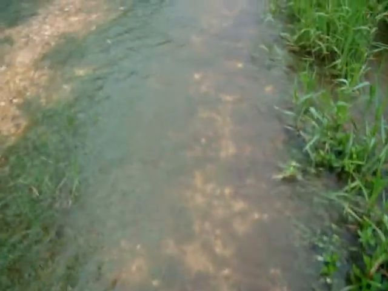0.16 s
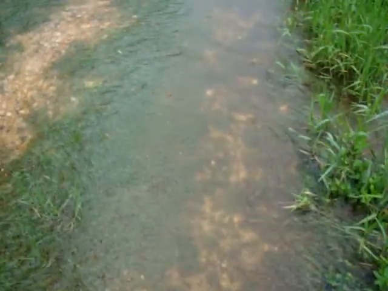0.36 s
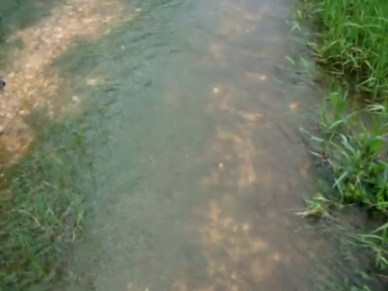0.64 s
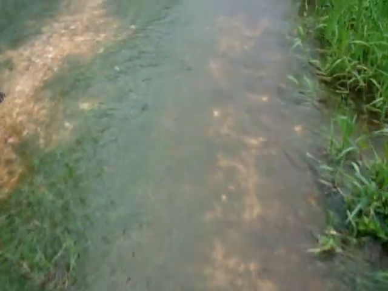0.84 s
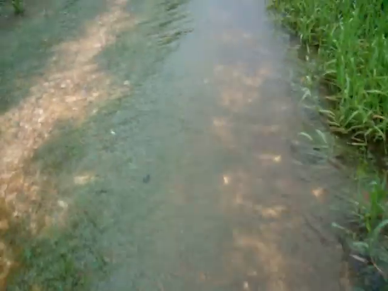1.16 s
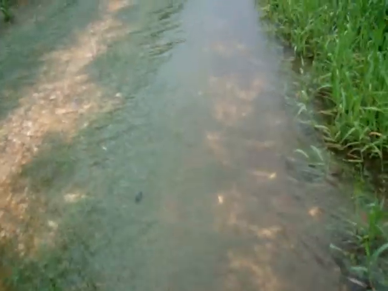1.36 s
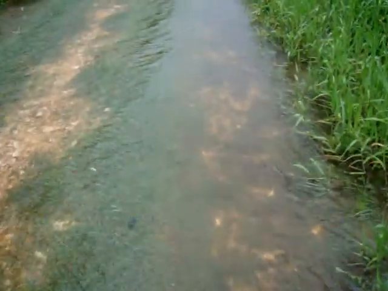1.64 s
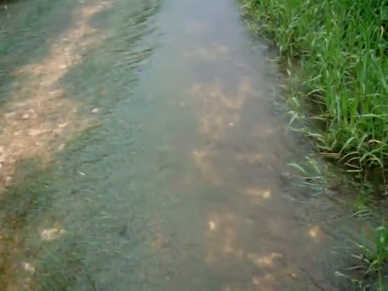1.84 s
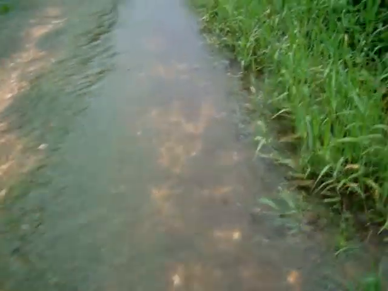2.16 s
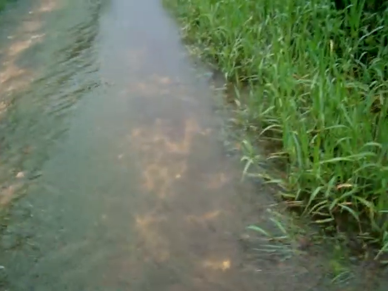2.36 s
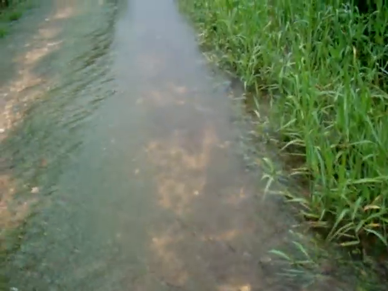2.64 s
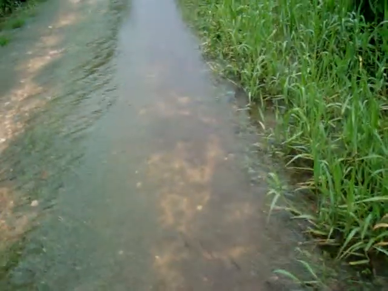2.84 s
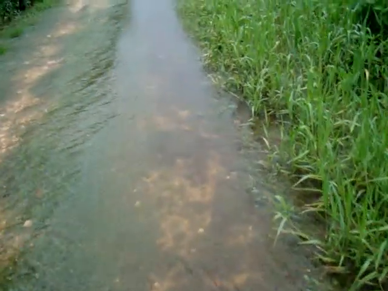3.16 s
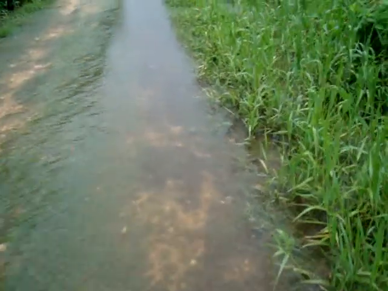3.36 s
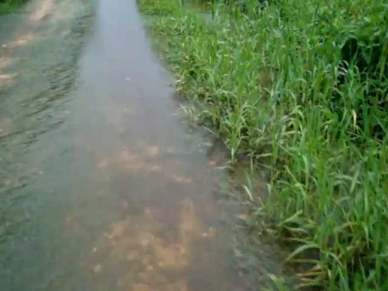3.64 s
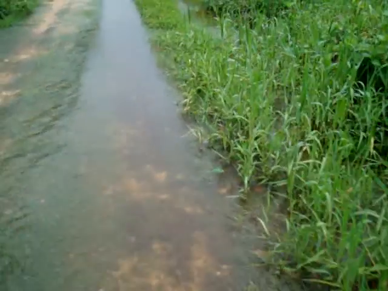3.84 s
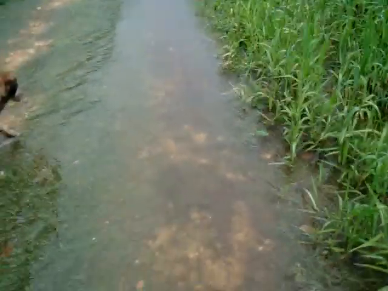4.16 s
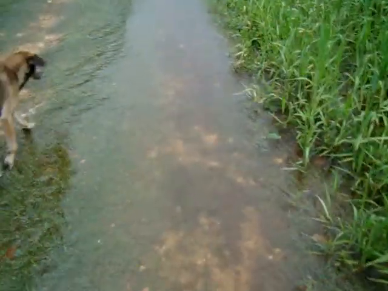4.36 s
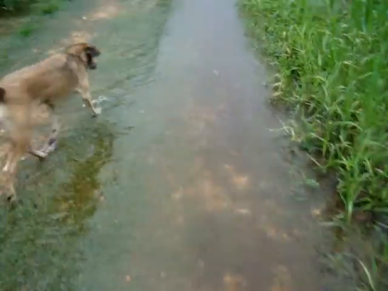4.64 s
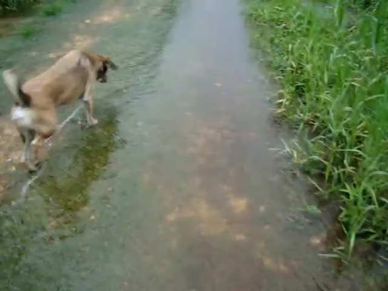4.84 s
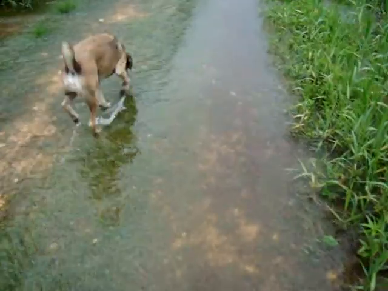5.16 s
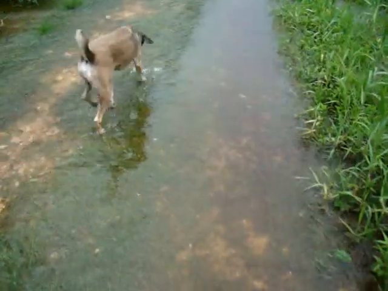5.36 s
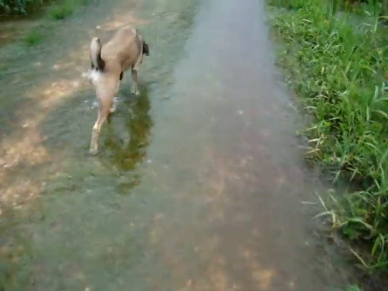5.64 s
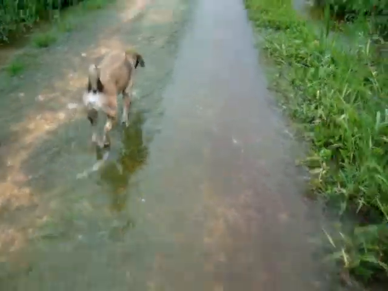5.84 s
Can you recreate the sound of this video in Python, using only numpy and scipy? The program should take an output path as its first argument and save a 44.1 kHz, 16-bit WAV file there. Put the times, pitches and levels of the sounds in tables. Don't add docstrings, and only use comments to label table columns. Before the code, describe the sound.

Outdoors on a flooded grassy track, a thick, steady frog chorus buzzes and croaks, with a fast rattling trill, low hooting toads and thin insect rasps. About five slow wading steps swell the water's hiss and gurgle, leaving plops, bright drips and sharp slaps. One microphone hears everything, its level dipping briefly at several splashes.

```python
import sys
import numpy as np
from scipy import signal
from scipy.io import wavfile
from scipy.ndimage import uniform_filter1d

SR = 44100
rng = np.random.default_rng(int(sys.argv[2]) if len(sys.argv) > 2 else 0)


def linear_from_db(decibels):
    return 10 ** (np.asarray(decibels, float) / 20)


def wav_record(signal):
    frames = np.transpose(np.atleast_2d(signal))
    bounded = np.clip(frames, -1, 1)
    quanta = np.round(bounded * 32767).astype(np.int16)
    wavfile.write(sys.argv[1], SR, quanta)


N = 264820

# t/s, level above calm/dB
WADING_STEPS = [
    (.78, 8),
    (2.068, 7.5),
    (3.13, 3.5),
    (4.3, 2.5),
    (5.43, 4.5),
]


def rms_one(x):
    return x / np.sqrt(np.mean(x ** 2) + 1e-20)


def in_time(rows):
    s, *columns = np.transpose(rows)
    return [np.interp(np.arange(N) / SR, s, c) for c in columns]


def swells(events, rise_s, fall_s):
    t = np.arange(N) / SR
    return np.max([np.interp(t, [s - rise_s, s, s + fall_s], [0, db, 0]) for s, db in events], axis=0)


def drift(rate_hz):
    r = np.exp(-80 * np.pi * rate_hz / SR)
    white = rng.standard_normal(N // 40 + 2002)
    slow = signal.lfilter([1], [1, -2 * r, r * r], white)[2000:]
    return np.interp(np.arange(N) / 40, np.arange(len(slow)), rms_one(slow))


def resonate(x, hz, width_hz):
    r = np.exp(-np.pi * width_hz / SR)
    section = [1 - r, 0, r - 1, 1, -2 * r * np.cos(2 * np.pi * hz / SR), r * r]
    return signal.sosfilt([section, section], x + 1e-18)


def bandpass(x, low_hz, high_hz):
    return signal.sosfilt(signal.butter(2, [low_hz, high_hz], "band", fs=SR, output="sos"), x)


def pulses(cycles, rough_db):
    at = np.flatnonzero(np.diff(np.floor(cycles)) > 0)
    clicks = np.zeros(N)
    clicks[at] = linear_from_db(rough_db * rng.standard_normal(N // 40)[:len(at)])
    return clicks


def slide(hz, gain):
    return np.sqrt(2) * gain * np.sin(2 * np.pi * np.cumsum(hz) / SR)


def crowd(count, low_hz, high_hz, width_hz, per_s, calls_per_s, depth_db):
    out, t = 0, np.arange(N) / SR
    for hz, (own, start) in zip(np.linspace(low_hz, high_hz, count), rng.random((count, 2))):
        wander = drift(3.0)
        calls = calls_per_s * t * (.8 + 0.405 * own) + start + 0.15 * wander
        swell = linear_from_db(depth_db * np.sin(2 * np.pi * calls))
        clicks = pulses(per_s * (.85 + .3 * own) * t + .8 * wander, 1.5) * swell
        out = out + rms_one(resonate(clicks, hz, width_hz))
    return out / np.sqrt(uniform_filter1d(out ** 2, size=SR // 12))


def blips(events, cycles, rise, gain_db):
    out = np.zeros(N + SR)
    for s, peak_db, hz in events:
        age = np.arange(int(8 * cycles / hz * SR)) * hz / SR / cycles
        tone = np.sin(2 * np.pi * cycles * age * (1 + rise * (age / 2 - 1)))
        at = int((s - cycles / hz) * SR)
        out[at:at + len(age)] += linear_from_db(peak_db + gain_db) * age * np.exp(1 - age) * tone
    return out[:N]


def far_toads(count, blur):
    # t/s, level/dB
    toad_levels = [(0, -37.5), (.7, -33.5), (.95, -36), (2.14, -32), (2.45, -38), (2.85, -33), (3.5, -34),
                   (4.85, -39), (5.05, -35), (6, -34)]
    out = np.zeros(N + SR)
    for s, length, pitch, glide, high, level in rng.random((count, 6)):
        n = int((.04 + .12 * length) * SR)
        upper = high < .25
        centre_hz = (785 + 60 * (pitch - .5)) if upper else (570 + 100 * (pitch - .5))
        hz = centre_hz + 260 * (glide - .55) * (np.arange(n) - n / 2) / SR
        at = int(s * (N + SR - n))
        out[at:at + n] += slide(hz, np.hanning(n) * linear_from_db(4.6 * level - 0.53 * upper))
    hum = 0
    for hz, width_hz, weight in (597, 130, 1), (755, 230, .57), (352.5, 64, .33):
        hum = hum + weight * resonate(rng.standard_normal(N), hz, width_hz)
    blurred = rms_one(out[SR // 2:SR // 2 + N]) + blur * rms_one(hum)
    even = blurred / np.sqrt(uniform_filter1d(blurred ** 2, size=SR // 8))
    return linear_from_db(in_time(toad_levels)[0] - 0.5) * even


def buzzing_frogs():
    # t/s, level/dB
    buzz_levels = [(0.0, -28.5), (2.1, -28.5), (2.31, -30.5), (3.18, -26), (4.74, -31), (6.0, -25.5)]
    # t/s, level above the crowd/dB
    surges = [(.02, 0.5), (.37, 3.5), (.6, 1), (.84, 5.5), (1.07, 5), (1.25, 2.5), (1.46, 4), (1.66, 3.5),
              (1.85, 1), (2.03, 1), (2.91, -5), (3.05, 1.5), (3.33, 2), (3.97, 4), (4.14, 3), (4.47, 1),
              (4.56, 4), (4.7, 5), (5.6, 2), (5.72, 2), (5.83, 2), (5.95, -1.5)]
    level_db = in_time(buzz_levels)[0] + swells(surges, rise_s=0.056, fall_s=0.075)
    buzz = crowd(count=9, low_hz=2390, high_hz=3080, width_hz=383, per_s=195, calls_per_s=5.5, depth_db=4.0)
    return linear_from_db(level_db - 2.0) * buzz


def shrill_frogs():
    # t/s, level/dB
    shrill_levels = [(0.0, -38.5), (0.32, -36.5), (2.21, -34.5), (2.42, -39.5), (2.77, -33.5), (3.04, -37),
                     (3.78, -34), (4.04, -38), (5.93, -35), (6.0, -37.5)]
    shrill = crowd(count=10, low_hz=5047, high_hz=5550, width_hz=485,
                   per_s=110, calls_per_s=4.3, depth_db=6.0)
    return linear_from_db(in_time(shrill_levels)[0] + 1.5) * shrill


def triller():
    # t/s, level/dB
    trill_levels = [(0, -32), (.28, -34), (.45, -30.5), (1.1, -29.5), (1.45, -30), (1.8, -32.5),
                    (2.07, -30.5), (2.3, -40.5), (2.7, -44), (3.18, -34), (3.95, -35), (4.74, -35),
                    (5.56, -31.5), (6, -33)]
    # t/s, share of the near frog/0-1, lowering of its throat/0-1
    near_trill = [(.28, 0, 0), (.4, .75, .1), (.8, .88, .15), (1.6, .8, .2), (2.0, .6, 0), (2.3, .2, 0),
                  (3.2, .5, .5), (4.4, .2, 1), (4.8, .65, 1), (5.3, .45, 1), (6, .55, 1)]
    (level_db,), (share, lowered) = in_time(trill_levels), in_time(near_trill)
    t = np.arange(N) / SR
    rush = .96 * np.exp((.3 - t) / .4)
    tiring = .8 * np.maximum(t - 4.7, 0)
    knocks = 39.7 * t + 1.63 - rush - tiring
    first = pulses(knocks + .025 * drift(30), 2.2)
    near = 0
    for hz, weight in (1870, 1 - lowered), (1785, lowered):
        pair = first + .75 * np.roll(first, round(9 / hz * SR))
        after = resonate(np.roll(first, SR // 300), .88 * hz, 300)
        near = near + weight * rms_one(resonate(pair, hz, 360) + .45 * after)
    others = crowd(count=6, low_hz=1683, high_hz=1942, width_hz=280, per_s=90, calls_per_s=0.72, depth_db=1.5)
    return linear_from_db(level_db + 0.76) * (np.sqrt(share) * near + np.sqrt(1 - share) * others)


def insects():
    # t/s, level of the high, middle and low insect/dB
    insect_levels = [(0.0, -46, -35, -42.5), (0.17, -42.5, -41.5, -45.5), (0.97, -38, -39, -37.5),
                     (1.17, -42.5, -41, -41.5), (2.02, -38, -39, -41.5), (2.19, -38.5, -37, -38),
                     (2.39, -42.5, -44, -41.5), (2.69, -36.5, -42.5, -47), (4.38, -43.5, -40.5, -38.5),
                     (5.16, -40, -41.5, -43.5), (5.38, -43, -38.5, -39), (6.0, -45.5, -43, -38.5)]
    insect_voices = [
        (8803, 330, 0.6),
        (8310, 1600, 0.67),
        (6703, 470, 0.94),
        (6153, 250, 1),
    ]
    wings = [
        (-.19, 85.23, .108),
        (-.12, 56.7, 0),
        (-.38, 42.67, 0),
    ]
    out, t = 0, np.arange(N) / SR
    high_db, middle_db, low_db = in_time(insect_levels)
    levels = [high_db, high_db - 3.5, middle_db, low_db]
    strokes = wings[:1] + wings
    for level_db, (done, per_s, slowing), (hz, width_hz, share) in zip(levels, strokes, insect_voices):
        stroke = (done + per_s * t - slowing * t ** 2 / 2 + share / 2 + 0.058) % 1
        gate = np.sin(np.pi * np.clip(stroke / share, 0, 1)) + 0.12
        rasp = 0.62 * np.sin(2 * np.pi * hz * t + 2.5 * drift(150)) + rng.standard_normal(N)
        out = out + linear_from_db(level_db - 1.5) * rms_one(resonate(gate * rasp, hz, width_hz))
    return out


def running_water():
    # f/Hz, spectral level/dB per Hz
    water_colour = [(18, -75), (30, -39), (130, -34.5), (240, -35.5), (330, -20.5), (450, -15), (600, -4),
                    (1090, -8), (1850, -3.5), (2900, -4), (4470, -7), (5600, -12.5), (7470, -18.5),
                    (10300, -24), (13300, -60)]
    out, white, edges = 0, rng.standard_normal((2, N)), 28 * 2 ** np.arange(0, 8.7, 1 / 3)
    colour_hz, colour_levels = np.transpose(water_colour)
    together, stir_db = drift(10), swells(WADING_STEPS, rise_s=0.52, fall_s=0.28)
    for k, (low, high) in enumerate(zip(edges, edges[1:])):
        band = bandpass(white[k % 2], low, high)
        colour_db = np.interp(np.log(low * high) / 2, np.log(colour_hz), colour_levels)
        reach = np.exp(-(np.log(low / 1100) / 1.3) ** 2) + (low > 2500) * 0.15
        patchy_db = 1.3 * together + (1.8 if low < 2500 else 0.6) * drift(11)
        out = out + band * linear_from_db(colour_db + reach * (stir_db - stir_db.mean()) + patchy_db)
    return linear_from_db(-44 + stir_db.mean() + 12.5) * rms_one(out)


def spray():
    # t/s, level above the steady drizzle/dB
    flung = [
        (.23, 7.5),
        (.32, 3),
        (.67, 7.5),
        (1.07, 3),
        (2.22, -3),
        (3.49, 8),
        (3.96, 14),
        (4.2, 5),
        (4.62, 2.5),
        (5.21, 6.5),
    ]
    sizes = linear_from_db(5.1 * np.minimum(rng.exponential(1, N), 5)) * rng.choice([-1, 1], N)
    drops_per_s = 4000 * linear_from_db(3.0 * drift(40))
    drops = sizes * (rng.random(N) < drops_per_s / SR)
    spray_db = -47 + swells(flung, rise_s=0.07, fall_s=0.055)
    return linear_from_db(spray_db + 6.5) * rms_one(bandpass(drops, 6000, 12000))


def whoops():
    # t/s, length/s, start f/Hz, end f/Hz, level/dB
    whoop_calls = [(0.044, 0.76, 365, 452.5, -49.5), (2.081, 0.89, 369.6, 556, -47),
                   (2.8, 0.82, 340, 505.4, -45.5), (3.854, 0.66, 382, 435, -55),
                   (5.095, 0.79, 344.6, 506, -49), (0, 0.3, 309.6, 285, -54.5),
                   (0.048, 0.61, 350, 319, -52), (0.752, 0.16, 316, 270, -70),
                   (0.947, 0.51, 349, 326.4, -55), (1.105, 0.46, 309, 275, -54),
                   (1.313, 0.26, 338, 320, -44.5), (1.58, 0.16, 351, 341, -44.5),
                   (1.747, 0.35, 328, 321, -53), (2.283, 0.84, 341.4, 306.5, -53.5),
                   (3.286, 0.49, 340, 311, -47), (3.588, 0.2, 284, 282, -52), (4.39, 0.25, 345, 314, -49),
                   (4.698, 0.2, 356, 336, -61), (5.249, 0.32, 289.3, 279, -54),
                   (5.426, 0.44, 355, 309, -46.5), (2.95, .35, 322, 315, -58),
                   (4.902, 0.57, 325, 320, -56.5)]
    out, waver = np.zeros(N), 1 + .007 * drift(12)
    for s, length, start_hz, end_hz, level_db in whoop_calls:
        n, at = int(length * SR), int(s * SR)
        hz = np.geomspace(start_hz, end_hz, n) * waver[at:at + n]
        out[at:at + n] += slide(hz, linear_from_db(level_db - 0.5) * signal.windows.tukey(n, .35))
    return out * linear_from_db(3.0 * drift(20))


def croaks():
    # t/s, peak level/dB, throat f/Hz
    croak_calls = [(0.0328, -16, 2870), (0.1191, -14, 2590), (0.222, -29, 2600), (0.35, -16, 2730),
                   (0.4394, -21, 2890), (0.5232, -15, 2560), (0.6, -16, 2770), (0.6609, -24, 2710),
                   (0.7542, -21, 2780), (1.0525, -22, 2870), (1.1025, -21, 2860), (1.2126, -12, 2930),
                   (1.305, -13, 2850), (1.4427, -18, 2600), (1.49, -18, 2900), (1.5476, -12, 2670),
                   (1.6462, -13, 2830), (1.6971, -9.5, 2700), (1.8385, -9.5, 2800), (1.925, -19, 2830),
                   (2.0052, -11.5, 3100), (2.0823, -13, 2800), (2.121, -16, 2750), (2.2867, -16, 3130),
                   (2.5052, -17, 2840), (2.674, -17, 2810), (2.893, -24, 2570), (3.01, -23, 2640),
                   (3.1155, -15, 2550), (3.271, -15, 2700), (3.3333, -16, 3020), (3.5234, -14, 2650),
                   (3.5707, -15, 2510), (3.7199, -14, 2810), (3.784, -16, 3000), (3.9556, -19, 2580),
                   (3.9988, -15, 2790), (4.129, -18, 2900), (4.1664, -25, 2770), (4.2091, -13.5, 2580),
                   (4.2695, -23, 2480), (4.371, -17, 2680), (4.4527, -11, 2590), (4.5315, -16, 2480),
                   (4.672, -22, 2660), (4.8126, -17, 2710), (4.9564, -11.5, 2740), (5.0665, -12, 2700),
                   (5.1726, -16, 2400), (5.2535, -13, 2760), (5.3986, -14, 3050), (5.44, -13, 2900),
                   (5.4784, -18, 2700), (5.5413, -12, 2770), (5.5861, -10.5, 2740), (5.663, -19, 2770),
                   (5.7194, -15, 2860), (5.7657, -15, 3010), (5.8002, -14, 2660), (5.9508, -15, 2700)]
    length_s, pulses_per_s = .035, 190
    out, n = np.zeros(N + SR), int(length_s * SR)
    age = np.arange(n) / n
    for (s, peak_db, hz), own in zip(croak_calls, rng.random((len(croak_calls), 2))):
        cycles = pulses_per_s * (.85 + .3 * own[0]) * length_s * age
        clicks = np.diff(np.floor(cycles), prepend=-1) * (1 - 0.78 * age)
        voice = resonate(clicks, hz, 420)
        at = int(s * SR)
        out[at:at + n] += linear_from_db(peak_db - 6.5) * voice / np.abs(voice).max()
    return out[:N]


def drips():
    # t/s, peak level/dB, f/Hz
    drip_events = [(0.043, -23, 1300), (0.601, -25, 1430), (0.633, -19, 1280), (0.732, -31, 935),
                   (0.866, -20, 1290), (1.126, -22.5, 850), (1.959, -14.5, 1320), (2.059, -24, 1370),
                   (2.199, -17, 1190), (2.511, -24, 1090), (2.866, -16, 1440), (2.926, -17.5, 1190),
                   (2.974, -22.5, 1010), (3.126, -18.5, 975), (3.212, -34, 1200), (3.329, -19, 1254),
                   (3.517, -21, 1060), (3.614, -26, 920), (4.006, -24, 1070), (4.143, -18.5, 1210),
                   (4.523, -27, 1125), (4.754, -25.5, 1037), (5.007, -34, 1030), (5.406, -20, 1280),
                   (5.583, -14.5, 1110)]
    return blips(drip_events, cycles=2.9, rise=0.018, gain_db=-2.6)


def hoots():
    # t/s, peak level/dB, f/Hz
    hoot_calls = [(0.078, -27, 620), (0.13, -33, 555), (0.193, -27, 593), (0.427, -39, 617),
                  (0.471, -25, 553), (0.515, -32, 597), (0.582, -36, 660), (0.661, -28, 623),
                  (0.725, -27, 580), (0.838, -29, 550), (0.953, -21, 600), (1.068, -28, 563),
                  (1.166, -22, 598), (1.304, -27, 597), (1.43, -25, 550), (1.505, -23, 551),
                  (1.645, -22.5, 615), (1.789, -22, 570), (1.891, -25, 592), (1.938, -19, 586),
                  (2.009, -34, 563), (2.095, -22, 557), (2.205, -31, 637), (2.326, -28, 597),
                  (2.6, -31, 590), (2.712, -30, 590), (2.756, -37, 568), (2.815, -36, 626),
                  (2.946, -23, 593), (3.007, -32, 570), (3.094, -24, 570), (3.152, -26, 568),
                  (3.194, -20, 594), (3.329, -34, 537), (3.728, -20, 576), (3.806, -33, 581),
                  (3.873, -26, 616), (4.097, -26, 647), (4.174, -26, 614), (4.388, -25, 610),
                  (4.485, -31, 590), (4.572, -29, 535), (4.927, -25.5, 599), (4.983, -23, 589),
                  (5.073, -37, 540), (5.169, -21.5, 570), (5.234, -22, 603), (5.295, -29, 576),
                  (5.377, -31, 657), (5.467, -24, 593), (5.576, -19.5, 588), (5.639, -25, 534),
                  (5.69, -18, 594), (5.786, -25, 540), (5.905, -28, 535)]
    out, n, sag = np.zeros(N + SR), int(0.032 * SR), 0.033
    for s, peak_db, hz in hoot_calls:
        at = int(s * SR)
        sagging_hz = hz * np.linspace(1 + sag / 2, 1 - sag / 2, n)
        out[at:at + n] += slide(sagging_hz, linear_from_db(peak_db - 10.0) * signal.windows.tukey(n, .7))
    return out[:N]


def ticks():
    # t/s, peak level/dB, f/Hz
    tick_events = [(0.214, -26, 7500), (0.601, -18, 7200), (0.756, -25, 3850), (0.969, -24, 7897),
                   (1.057, -25, 7757), (1.129, -23, 7640), (2.028, -17, 6809), (2.087, -14, 3480),
                   (3.221, -14, 4200), (3.273, -13.5, 3800), (3.487, -19, 7369), (3.576, -16, 4060),
                   (3.94, -32, 7300), (3.97, -22, 8200), (4.214, -22, 8200), (4.278, -13.5, 8300),
                   (4.6, -20, 6960), (4.623, -14, 6500), (4.714, -14, 7800), (5.518, -17.5, 3650)]
    return blips(tick_events, cycles=1.7, rise=0.078, gain_db=0.25)


def plops():
    # t/s, peak level/dB, f/Hz
    plop_events = [(0.233, -41, 212), (0.624, -38, 220.4), (0.638, -45, 161), (0.667, -41, 171),
                   (0.712, -50, 232), (0.845, -52, 187), (1.436, -59, 270), (1.531, -63, 193),
                   (1.799, -38, 201), (1.917, -52, 177), (1.971, -44, 220), (2.018, -50, 188),
                   (2.907, -47, 215), (3.273, -38.5, 240), (3.586, -40, 223), (3.68, -59, 280),
                   (4.247, -42, 201), (4.408, -61, 174), (4.737, -47, 222), (5.372, -39, 254),
                   (5.434, -48, 258), (5.463, -44, 258)]
    return blips(plop_events, cycles=1.42, rise=0.15, gain_db=-3.0)


def droplets():
    per_step, scatter_s = 16, .22
    draws = rng.random((len(WADING_STEPS) * per_step, 4))
    step_s = np.repeat(np.array(WADING_STEPS)[:, 0], per_step)
    s = np.clip(step_s + scatter_s * 2 * (draws[:, 0] + draws[:, 1] - 1), .02, N / SR)
    events = zip(s, 6.5 * draws[:, 2], 850 * 1.99 ** draws[:, 3])
    return blips(events, cycles=2.36, rise=0.093, gain_db=-32)


def bubbles():
    # t/s, peak level/dB, f/Hz
    bubble_events = [(0.425, -30, 398), (0.727, -10, 664), (1.126, -28, 428), (1.448, -28, 350),
                     (1.551, -24, 330), (1.636, -28, 368), (1.993, -23.5, 423), (2.207, -36, 376),
                     (2.574, -30, 388), (3.271, -21, 420), (3.492, -36, 294), (3.84, -48, 425),
                     (4.247, -27.5, 310), (4.41, -29.5, 360), (4.999, -21, 464), (5.132, -31, 387),
                     (5.328, -17, 803), (5.489, -27.5, 396), (5.598, -41, 315)]
    return blips(bubble_events, cycles=2.11, rise=0.12, gain_db=-5.5)


def slaps():
    # t/s, peak level/dB
    slap_events = [(0.925, -9), (1.123, -4.5), (1.127, -8), (2.027, -15), (2.087, -8), (2.218, -4.5),
                   (2.51, -15), (2.915, -11), (2.947, -10), (3.218, -7.5), (3.271, -10), (3.575, -8),
                   (3.955, -11), (4.213, -10), (4.277, -6), (4.367, -9), (5.403, -3)]
    clicks = np.zeros(N)
    for s, peak_db in slap_events:
        clicks[int(s * SR)] = linear_from_db(peak_db - 4)
    decay = signal.lfilter([1], [1, -np.exp(-1 / (0.001 * SR))], clicks)
    return bandpass(4.4 * clicks + 0.7 * decay * rng.standard_normal(N), 450, 5500)


def bleats():
    # t/s, length/s, pulse rate/(1/s), throat f/Hz, level/dB
    bleat_calls = [
        (1.928, 0.23, 170, 1820, -30),
        (3.007, 0.25, 190, 1820, -34),
    ]
    out = np.zeros(N)
    for s, length, per_s, hz, level_db in bleat_calls:
        at = slice(int(s * SR), int((s + length) * SR))
        voice = rms_one(resonate(pulses(per_s * np.arange(N) / SR, 0.8), hz, 500))[at]
        out[at] += linear_from_db(level_db) * voice * signal.windows.tukey(len(voice), .6)
    return out


def closing_pockets():
    # t/s, length/s, start f/Hz, end f/Hz, level/dB
    glides = [
        (5.948, .031, 690, 1480, -33),
        (3.5, 0.0242, 546, 1244, -33.5),
    ]
    out = np.zeros(N + SR)
    for s, length, start_hz, end_hz, level_db in glides:
        n, at = int(length * SR), int(s * SR)
        out[at:at + n] += slide(np.geomspace(start_hz, end_hz, n), linear_from_db(level_db) * signal.windows.tukey(n, .5))
    return out[:N]


def sweeping_bubbles():
    # t/s, peak level/dB, f/Hz
    sweep_events = [
        (3.842, -30, 528),
        (5.003, -28.5, 693),
        (5.078, -44, 800),
    ]
    return blips(sweep_events, cycles=8.2, rise=.5, gain_db=-0.44)


def scene():
    calls = far_toads(count=600, blur=1.11) + buzzing_frogs() + shrill_frogs() + triller() + insects()
    calls = calls + whoops() + croaks() + hoots() + bleats()
    flow = running_water() + spray()
    wet = drips() + ticks() + plops() + droplets() + bubbles() + slaps() + closing_pockets() + sweeping_bubbles()
    return np.tile(calls + flow + wet, (2, 1))


def drop_weak_treble(x, below_db):
    hz, _, cells = signal.stft(x, SR, nperseg=576, noverlap=288)
    edges = 3740 * 1.075 ** np.arange(15)
    for low, high in zip(edges, edges[1:]):
        band = (hz >= low) & (hz < high)
        power = np.mean(np.abs(cells[band]) ** 2, axis=0)
        margin_db = below_db - 3.1 * np.log2(low / 7000)
        cells[band] *= np.where(power < np.median(power) / linear_from_db(2 * margin_db), .03, 1)
    top = uniform_filter1d(np.mean(np.abs(cells[hz > 7000]) ** 2, axis=0), size=2)
    cells[hz > 9300] *= np.where(top < .58 * np.median(top), .03, 1)
    return signal.istft(cells, SR, nperseg=576, noverlap=288)[1][:N]


def roll_off(x):
    return signal.sosfilt(signal.butter(12, 10410, fs=SR, output="sos"), x)


def record(dry):
    # t/s, depth/dB, thump level/dB
    ducks = [(0.932, 5, -50), (1.131, 3, -58), (2.227, 9, -47), (2.37, 6, -53), (2.932, 6, -59),
             (3.343, -2, -54), (3.607, -3, -55), (3.812, 1, -52), (3.977, 0, -53), (4.216, 11, -48),
             (4.624, 7.5, -68), (5.865, 5, -48)]
    steps, thumps = np.zeros((2, N))
    for s, depth_db, thump_db in ducks:
        steps[int(s * SR)] = depth_db
        thumps[int(s * SR)] = linear_from_db(thump_db + 15.5)
    reduction_db = signal.lfilter([1], [1, -np.exp(-1 / (0.0058 * SR))], steps)
    ducked = dry[0] * linear_from_db(-reduction_db)
    ducked = ducked + signal.lfilter([1], [1, -np.exp(-1 / (0.00035 * SR))], thumps)
    steep = signal.ellip(12, .1, 62, 9990, fs=SR, output="sos")
    cut = signal.sosfilt(steep, drop_weak_treble(ducked, below_db=3.5))
    return roll_off(np.tile(cut, (2, 1)))


dry = scene()
out = record(dry)
wav_record(out)
```